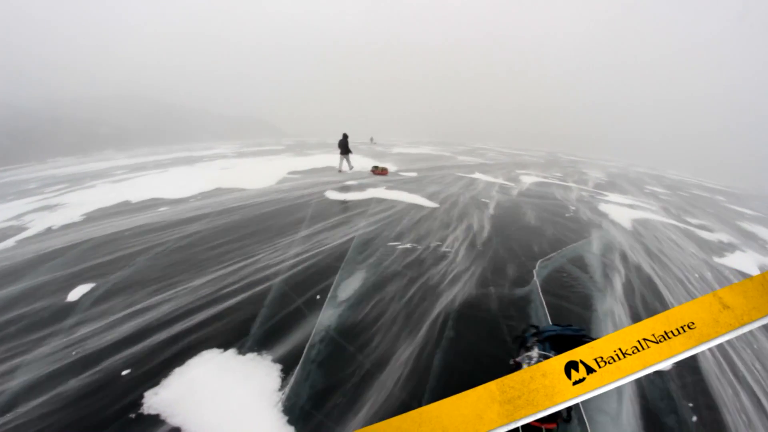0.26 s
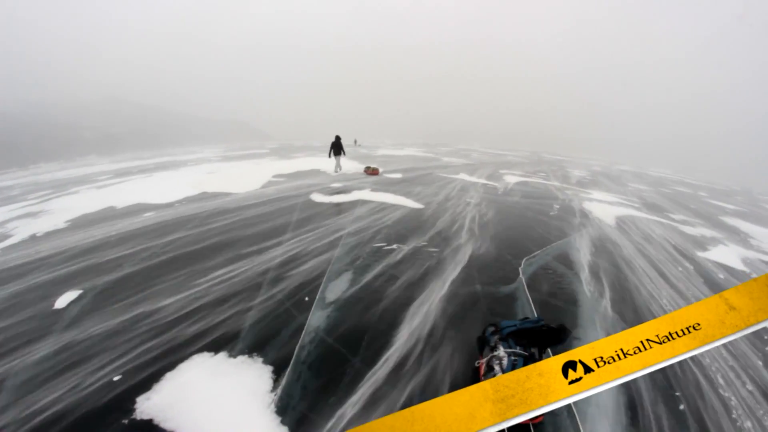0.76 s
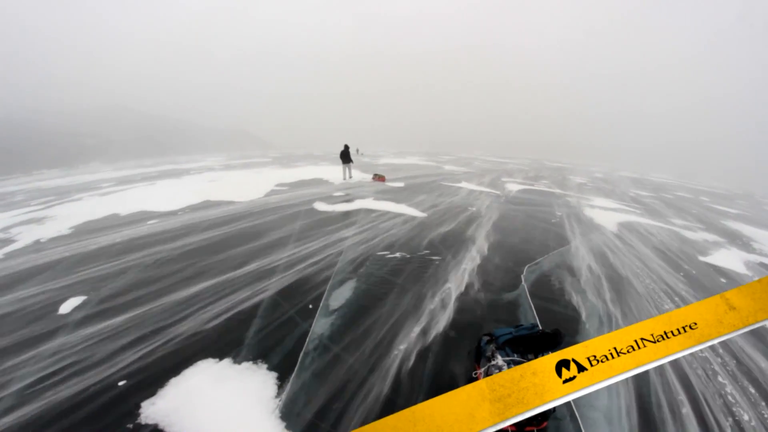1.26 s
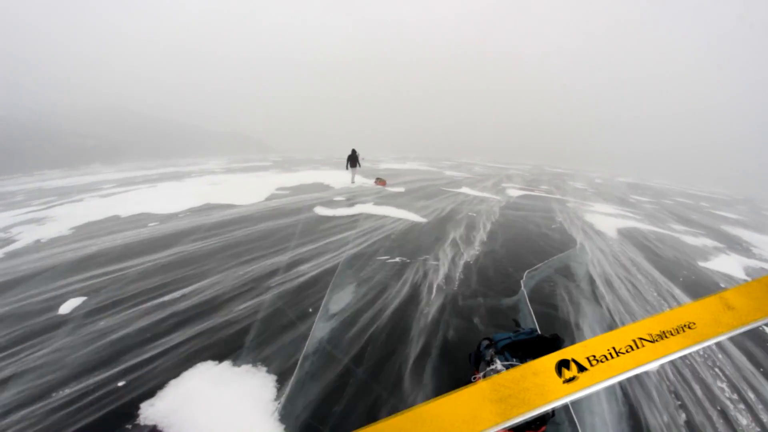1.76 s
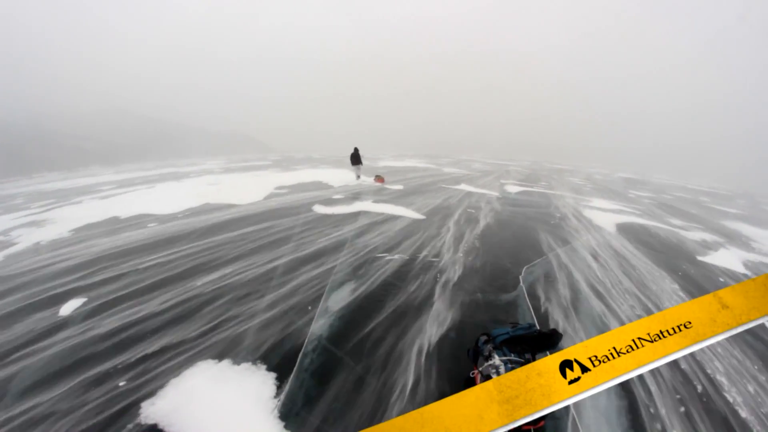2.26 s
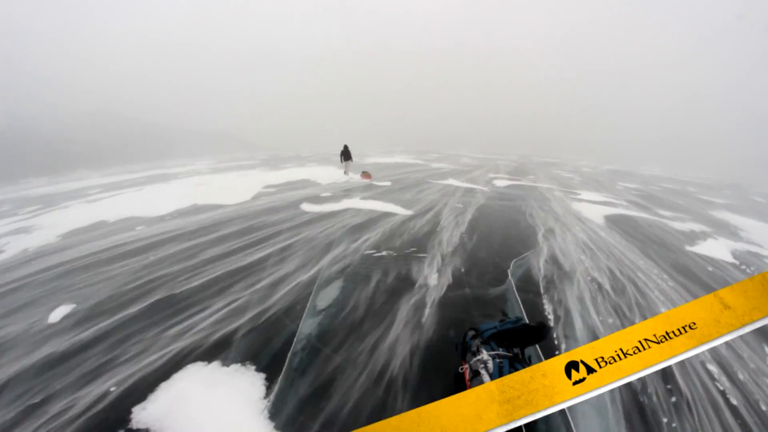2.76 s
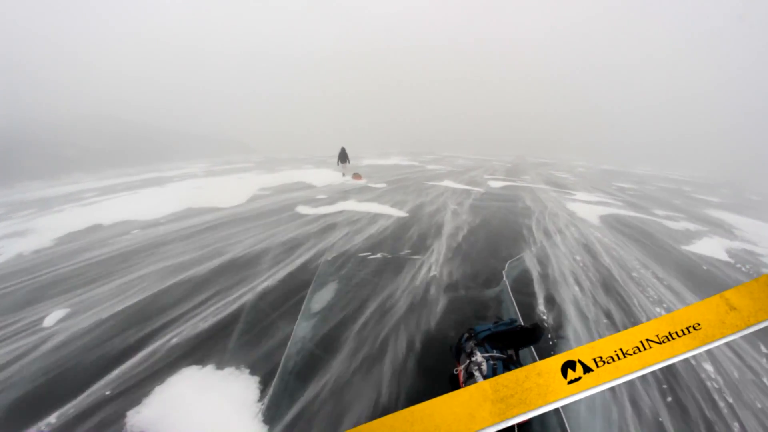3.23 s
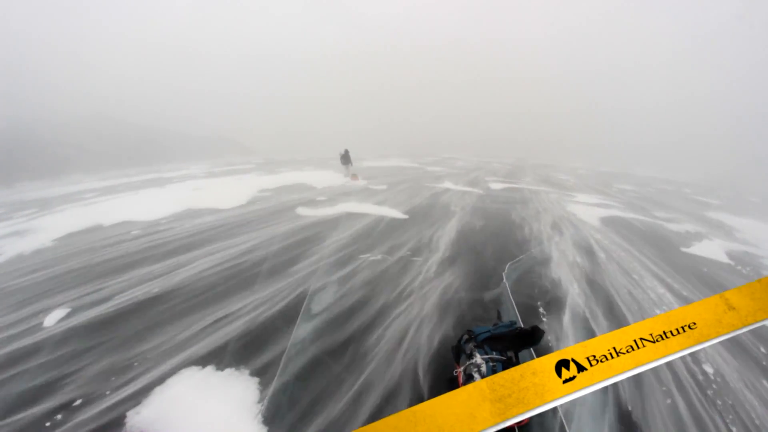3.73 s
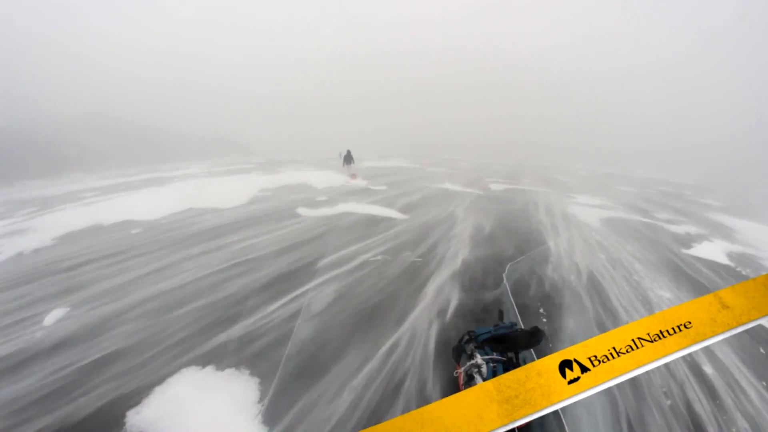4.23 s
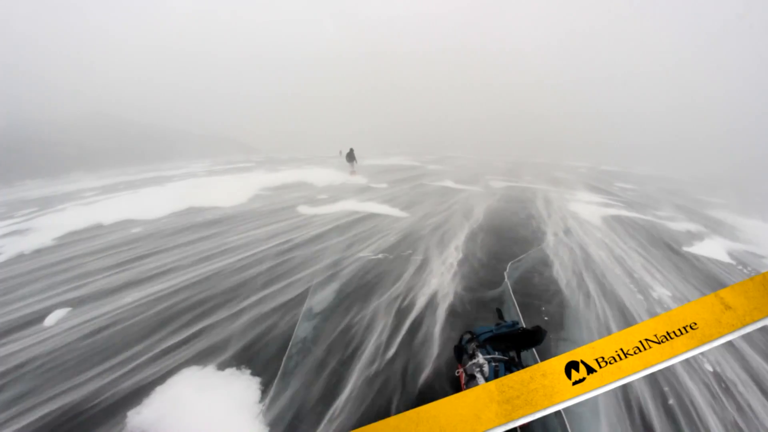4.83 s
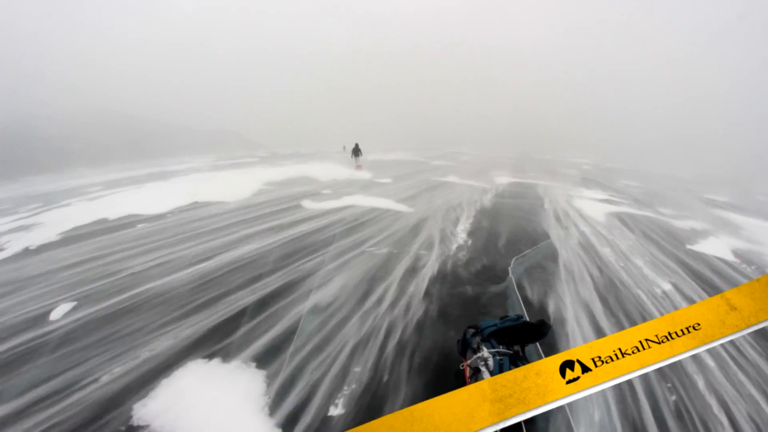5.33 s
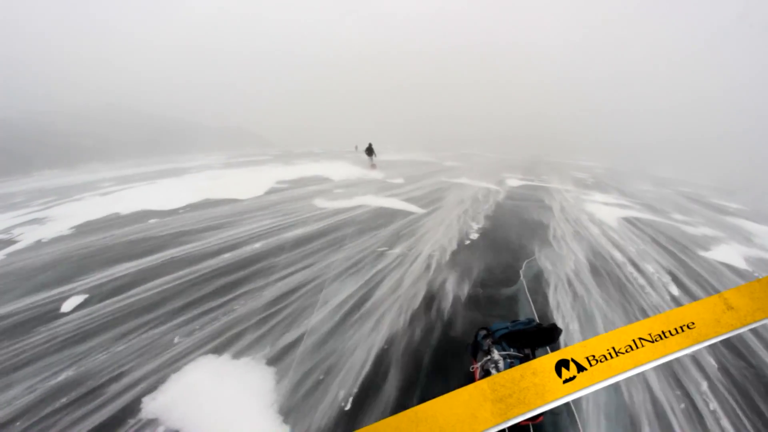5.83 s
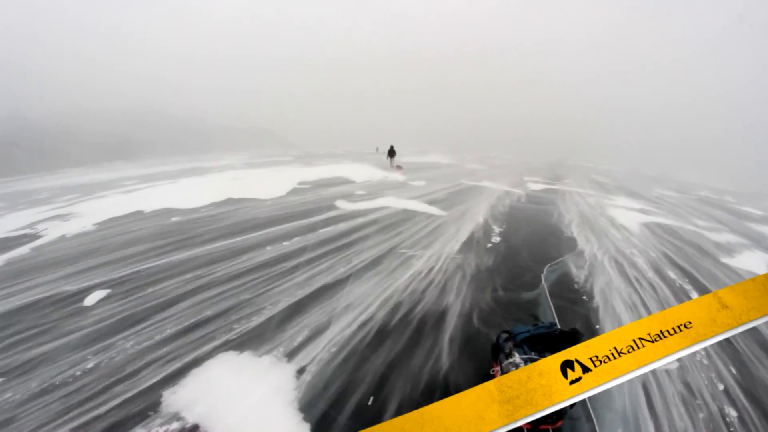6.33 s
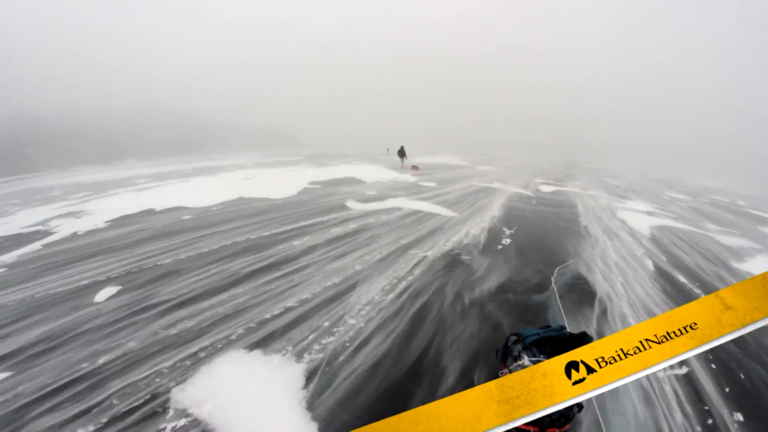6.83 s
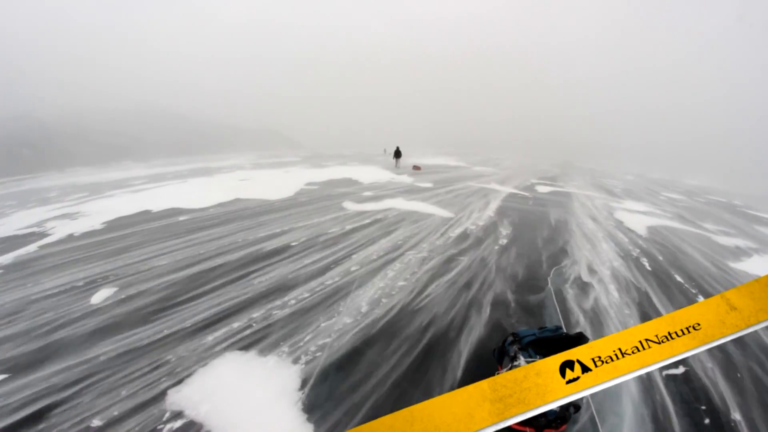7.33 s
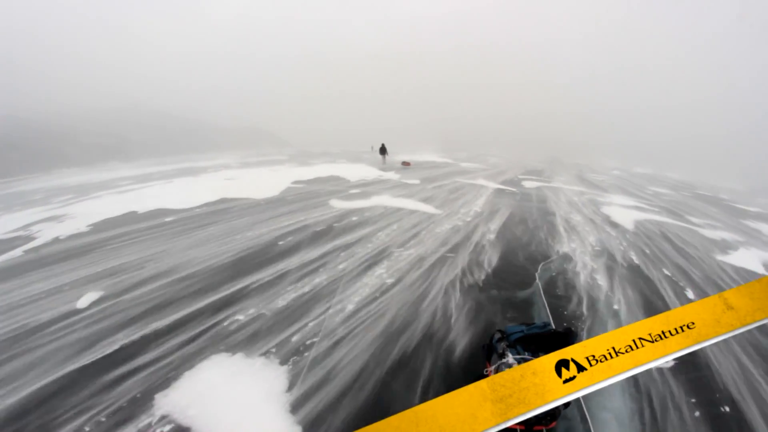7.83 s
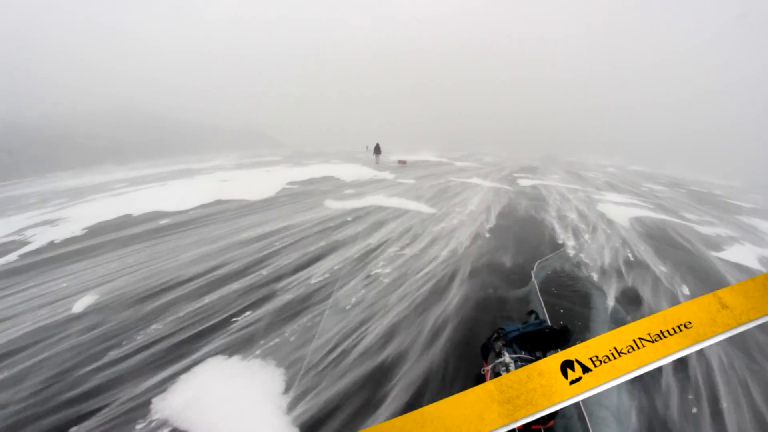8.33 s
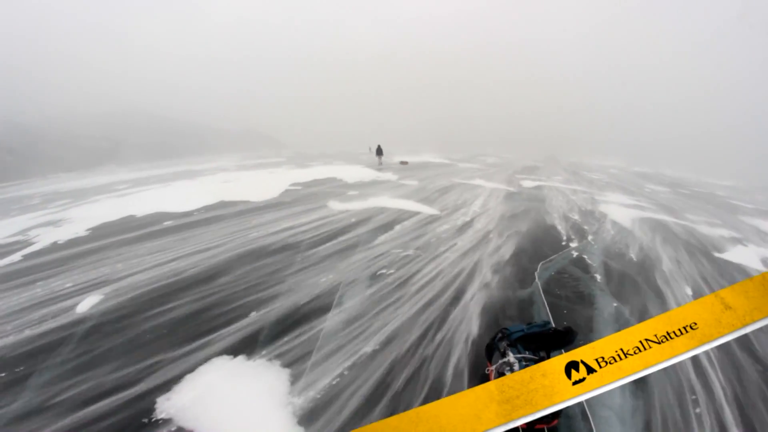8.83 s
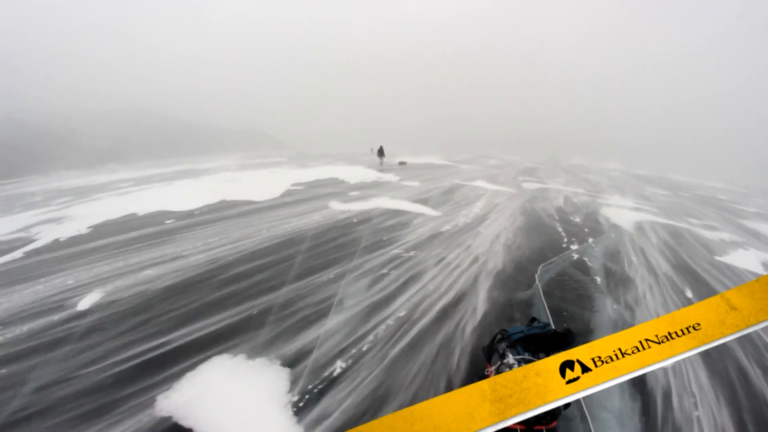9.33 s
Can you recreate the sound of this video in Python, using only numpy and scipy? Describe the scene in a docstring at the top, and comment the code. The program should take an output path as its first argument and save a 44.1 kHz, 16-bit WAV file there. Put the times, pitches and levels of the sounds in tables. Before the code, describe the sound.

A harsh, rasping blizzard wind roars over open ice, overloading the microphone, with spits of snow hitting it.

```python
"""A harsh, rasping blizzard roar with spits of snow, blowing over lake ice into a small microphone.
Eddies at the port overload it into an almost square wave: harder gusts sound higher and harsher,
hardly louder. Drifting snow hits the housing; the hardest shoves pin the membrane and choke
the sound for milliseconds. The roar of the ice field lies behind."""
import sys
import numpy as np
from scipy import signal
from scipy.fft import rfft, irfft, next_fast_len
from scipy.io import wavfile
from scipy.ndimage import uniform_filter1d, map_coordinates

SR = 44100
rng = np.random.default_rng(int(sys.argv[2]) if len(sys.argv) > 2 else 0)


def file_out(sig):
    """Save sig as 16-bit WAV at sys.argv[1]."""
    # one column per channel
    cols = np.atleast_2d(sig).T
    # limit, then scale
    lim = np.clip(cols, -1, 1)
    pcm = np.round(lim * 32767).astype(np.int16)
    wavfile.write(sys.argv[1], SR, pcm)


N = 422037

OVERLOAD_DB = -24  # amplifier clip level
USUAL_PRESSURE_DB, USUAL_SHOVE_DB = 8.5, -14
# spectrum of snow rubbing and hitting the housing: f/Hz, level/dB
SNOW_SPECTRUM = [(200, -40), (900, 15.5), (2000, 9.5), (4500, -5.5), (9000, -19), (16000, -25)]


def amp(db):
    """dB to gain."""
    return 10 ** (np.asarray(db) / 20)


def unit(x):
    """Scale to rms 1."""
    return x / np.sqrt(np.mean(x ** 2) + 1e-20)


def curve(rows):
    """Interpolate (t/s, value) rows per sample."""
    times_s, values = np.transpose(rows)
    return np.interp(np.arange(N) / SR, times_s, values)


def wobble(rate_hz):
    """Smooth random curve, rate_hz knots per second."""
    knots = rng.standard_normal(int(N * rate_hz / SR) + 4)
    return map_coordinates(knots, [np.arange(N) * rate_hz / SR])


def noise(spectrum, size=N):
    """Noise of rms 1, shaped by (f/Hz, level/dB) rows on a log axis."""
    n_fft = next_fast_len(size)
    hz, db = np.transpose(spectrum)
    bins_hz = np.fft.rfftfreq(n_fft, 1 / SR)
    gain = amp(np.interp(np.log(bins_hz + 1), np.log(hz), db))
    return unit(irfft(rfft(rng.standard_normal(n_fft)) * gain, n_fft)[:size])


def eddies(pitch_hz, reference_hz=360):
    """A frozen eddy pattern passes the port: faster air plays it higher."""
    # eddy pressure at reference_hz: f/Hz, level/dB
    spectrum = [(20, -25), (60, -19.5), (130, -8.5), (230, -1.5), (340, -0.5), (480, -4), (700, -9.5),
                (1100, -18), (2000, -32), (4000, -49), (9000, -53.5), (18000, -74)]
    travel = np.cumsum(pitch_hz / reference_hz)
    return map_coordinates(noise(spectrum, size=2 * N), [travel], mode="wrap")


def buffet(shove_db):
    """Large, slow swirls push the pressure off centre."""
    # swirl pressure: f/Hz, level/dB
    spectrum = [(8, -10), (25, -8), (40, -7.5), (70, -3.5), (130, -1.5), (220, -11), (500, -21),
                (1500, -100)]
    return amp(shove_db) * noise(spectrum)


def snow(level_db, clump_hz, clump_db=4.5):
    """Fine snow streams over the housing in clumps."""
    return amp(level_db) * unit(noise(SNOW_SPECTRUM) * amp(clump_db * wobble(clump_hz)))


def spurts(excess_db, unrest_db, level_db, width_s):
    """Snow puffs spit on the housing; the random ones come faster with shoves, harder with pressure."""
    # big spurts: t/s, relative peak level/dB
    big_spurts = [(0.303, -23), (0.434, -21.5), (0.896, -25), (0.924, -28), (1.146, -27), (1.259, -28),
                  (1.3, -36), (1.652, -35), (1.97, -29), (2.436, -19.5), (3.46, -23), (3.912, -22),
                  (4.58, -17), (4.905, -25), (5.054, -16), (5.459, -19), (6.211, -22), (6.859, -21)]
    t = np.arange(N) / SR
    gap, scatter_db = rng.standard_normal((120, 2)).T
    rate_hz = 6 * amp(1.5 * unrest_db)
    times_s = np.interp(np.cumsum(np.exp(gap / 2)), np.cumsum(rate_hz) / SR, t, right=np.inf)
    peaks_db = -27 + scatter_db + 0.83 * np.interp(times_s, t, excess_db)
    envelope = np.zeros(N)
    for at_s, peak_db in [*big_spurts, *zip(times_s, peaks_db)]:
        near = slice(*np.searchsorted(t, [at_s - 10 * width_s, at_s + 10 * width_s]))
        envelope[near] += amp(peak_db) * np.exp(-np.abs(t[near] - at_s - width_s) / width_s)
    return envelope * snow(level_db, clump_hz=500)


def overload(x):
    """The amplifier clips hard (2x oversampled); the steep edges make the rasp."""
    limit = amp(OVERLOAD_DB)
    clipped = np.clip(signal.resample_poly(x, 2, 1), -limit, limit)
    return signal.resample_poly(clipped, 1, 2)


def stall(x, drain_s, leak_db):
    """A pinned membrane passes almost nothing; its held value drains through the bass cut."""
    # membrane pinned by the hardest shoves: t/s, length/s
    stalls = [(0.8636, 0.0069), (1.4326, 0.0058), (3.9688, 0.0037), (4.303, 0.0085), (4.4177, 0.0063),
              (4.5608, 0.012), (5.3958, 0.0067), (5.4286, 0.0041)]
    out = x.copy()
    for start_s, length_s in stalls:
        span = np.arange(round(start_s * SR), round((start_s + length_s) * SR))
        held = np.sign(x[span[0]]) * amp(OVERLOAD_DB + 4)
        out[span] = held * np.exp(-np.arange(len(span)) / SR / drain_s) + amp(leak_db) * x[span]
    return out


def hiss(wind, gain_db):
    """Thin hiss over the rasp, rising and falling with its level."""
    # hiss: f/Hz, level/dB
    spectrum = [(500, -3), (3000, 3), (8000, -24), (16000, -12)]
    return amp(gain_db) * uniform_filter1d(np.abs(wind), size=256) * noise(spectrum)


def storm(level_db):
    """Broad roar of the whole ice field, heard in the lulls."""
    # wind over open ice: f/Hz, level/dB
    spectrum = [(80, -20), (300, -1), (700, 9.5), (1400, -4.5), (2600, -17.5), (5000, -32.5), (14000, -39)]
    return amp(level_db + wobble(rate_hz=4.7)) * noise(spectrum)


def scene():
    """Gusts raise pressure and pitch at the port; shoves break up the flow, lower and more ragged."""
    # wind pressure at the port: t/s, level/dB re overload
    gusts = [(0.0, 7.0), (0.72, 6.5), (0.83, -0.5), (0.9, 6.5), (1.15, 6.5), (1.37, -1.0), (1.55, 4.0),
             (1.9, 2.5), (2.42, 10.0), (2.56, 6.0), (2.75, 7.5), (3.6, 9.0), (4.4, 10.5), (4.52, 8.0),
             (4.62, 13.0), (5.2, 9.5), (5.38, 5.5), (5.58, 11.0), (6.1, 6.5), (7.3, 8.0), (7.75, 13.0),
             (7.88, 18.0), (8.25, 15.5), (8.6, 10.0), (9.3, 12.5), (9.57, 12.0)]
    # push of the large swirls: t/s, level/dB re eddies
    shoves = [(0, -15), (.55, -15), (1.3, -8.5), (1.8, -9.5), (2.4, -15.5), (3, -13), (4.45, -11.5),
              (4.7, -15), (4.95, -9), (5.4, -10), (5.7, -15), (6.35, -15), (6.8, -17.5), (8, -18),
              (9.5, -15)]
    pressure_db = curve(gusts) + 1.17 * wobble(rate_hz=10)  # with flutter
    shove_db = curve(shoves)
    excess_db = pressure_db - USUAL_PRESSURE_DB
    unrest_db = shove_db - USUAL_SHOVE_DB
    # a fast swirl pushes harder, sounds higher, carries more snow
    swirl_db = (2 + 0.17 * unrest_db) * wobble(rate_hz=190)
    wander_oct = 0.09 * wobble(rate_hz=35)
    pitch_oct = 0.069 * excess_db - 0.01 * unrest_db + 0.0071 * swirl_db + wander_oct
    flow = eddies(pitch_hz=362.05 * 2 ** pitch_oct) + snow(level_db=-21.5, clump_hz=380)
    port = amp(OVERLOAD_DB + pressure_db) * (buffet(shove_db) + amp(swirl_db) * flow)
    spits = spurts(excess_db, unrest_db, level_db=3.5, width_s=0.0044)
    return (port + spits + storm(level_db=-36))[None]


def record(dry):
    """Wind choked by brief dropouts and clipped to a rasp; thin hiss on top, highest treble cut."""
    top_hz = 16000
    wind = stall(dry[0], drain_s=0.00068, leak_db=-68)
    rasp = overload(wind) + hiss(wind, gain_db=-48)
    n_fft = next_fast_len(N + SR // 2)
    passband = np.fft.rfftfreq(n_fft, 1 / SR) < top_hz
    return irfft(rfft(rasp, n_fft) * passband, n_fft)[None, :N]


dry = scene()
out = record(dry)
file_out(out)
```